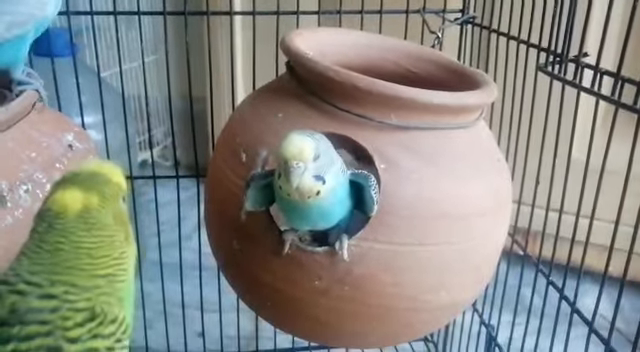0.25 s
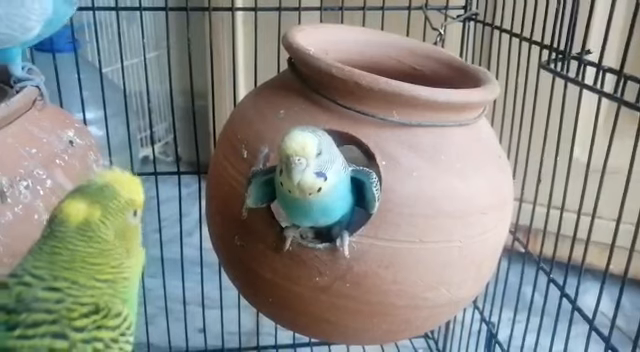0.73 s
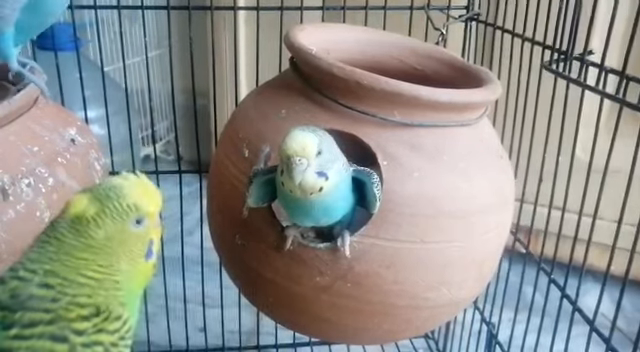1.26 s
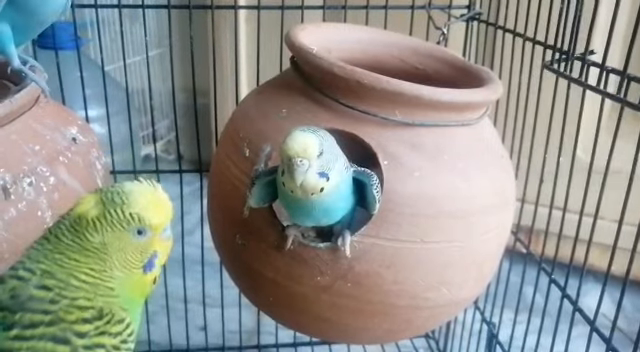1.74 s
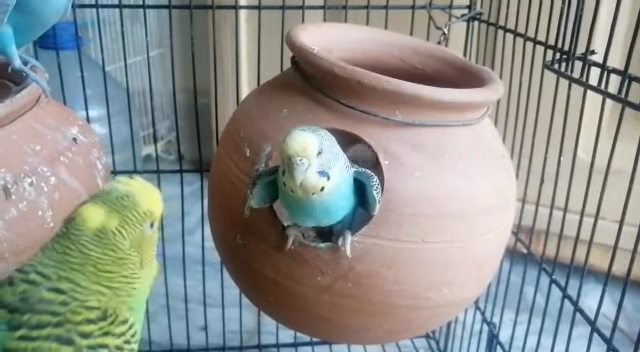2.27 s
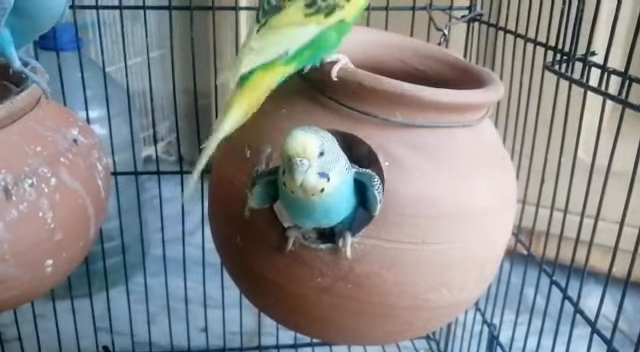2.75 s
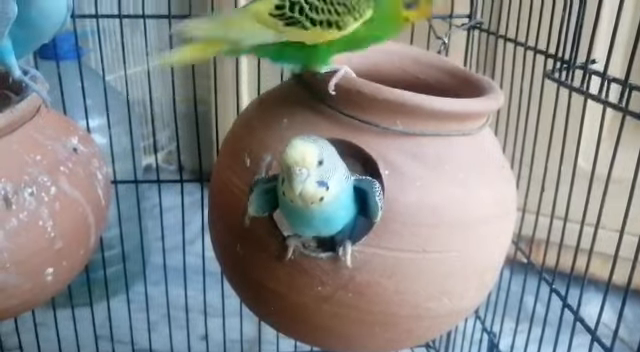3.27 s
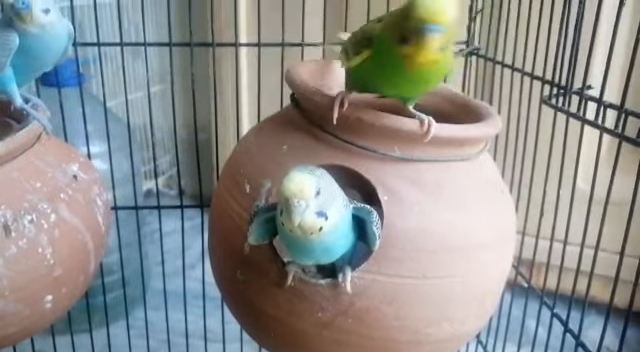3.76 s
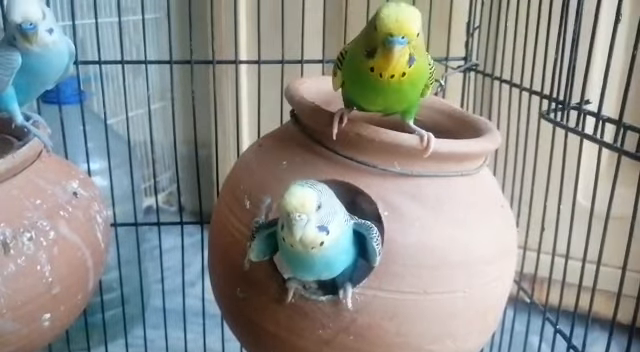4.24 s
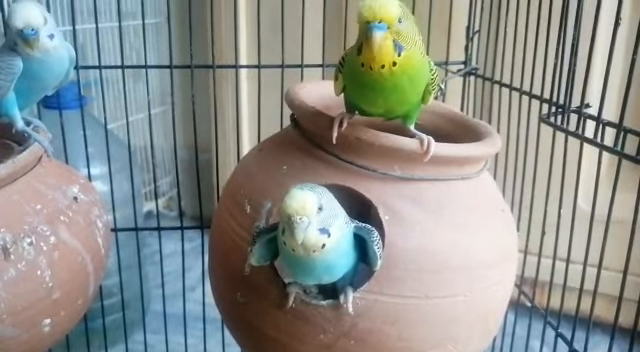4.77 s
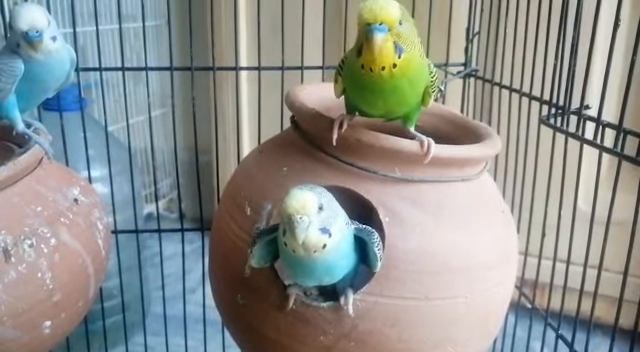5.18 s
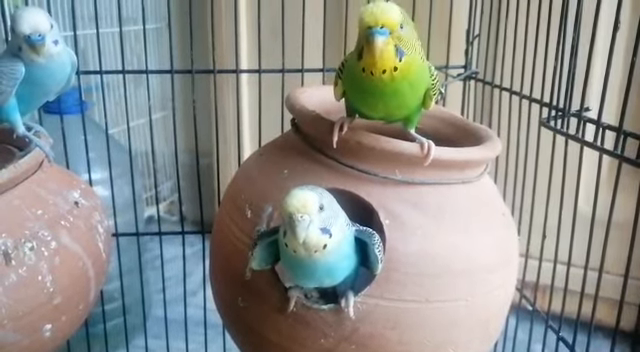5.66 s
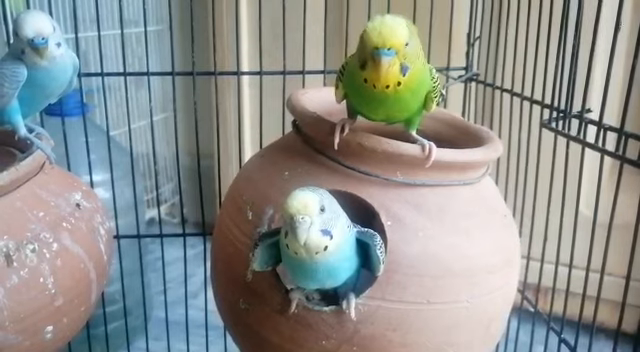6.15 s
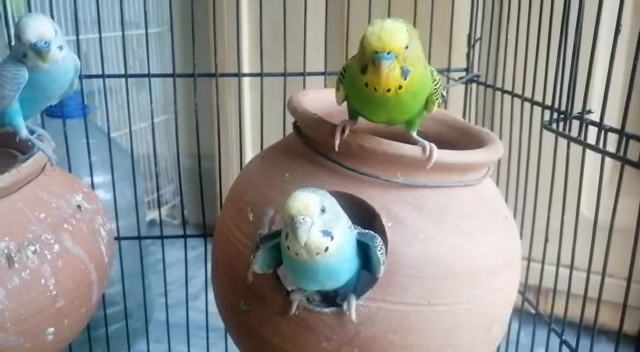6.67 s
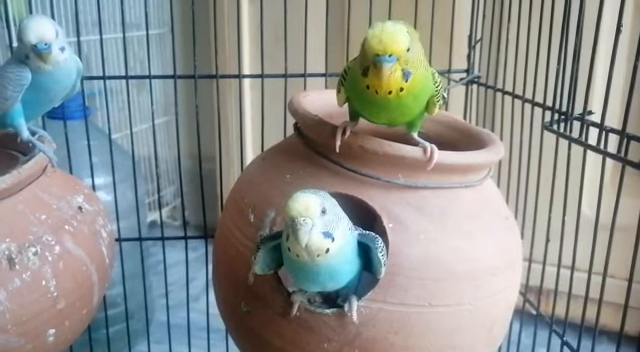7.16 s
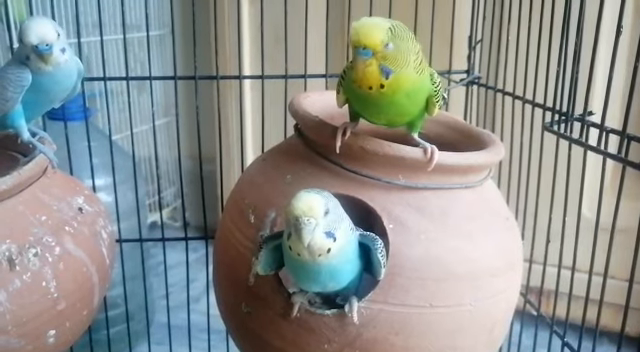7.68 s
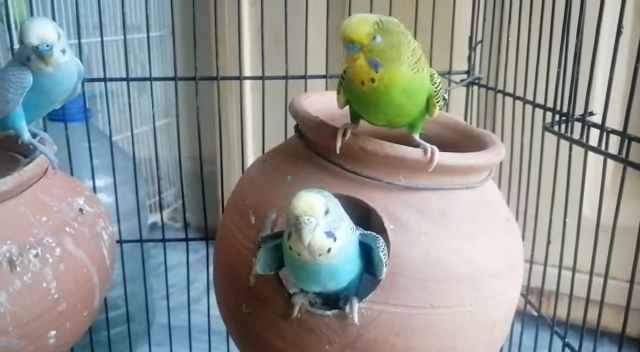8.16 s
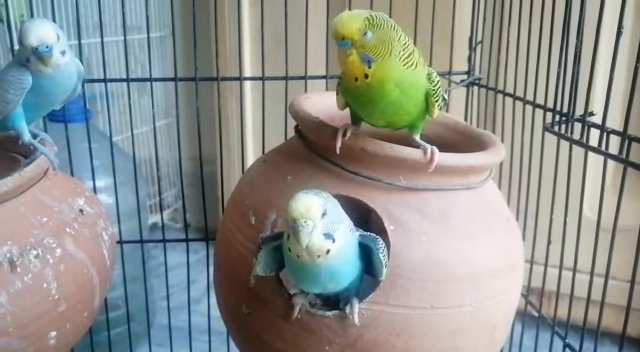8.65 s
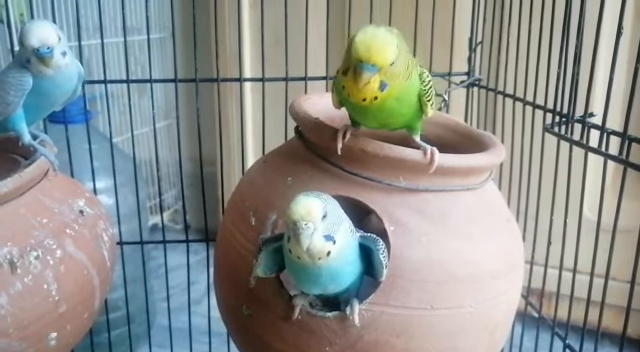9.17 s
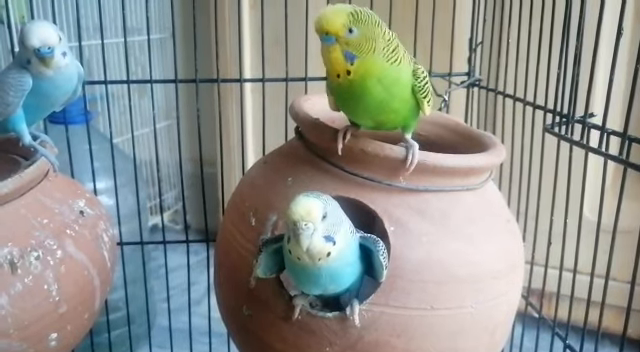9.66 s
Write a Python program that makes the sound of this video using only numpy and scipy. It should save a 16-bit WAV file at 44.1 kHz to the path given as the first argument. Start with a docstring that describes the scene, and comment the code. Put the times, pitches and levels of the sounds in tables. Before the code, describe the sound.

In a slightly echoing room, a nearby caged budgerigar warbles in short glides, croaks and clucks as more distant birds peep and squawk. A quick, soft thumping of wings reaches the microphone, then the chirping resumes, mixed with lower falling calls and a few small hard ticks. The chatter thins briefly and then builds to its liveliest at the end. Faint room air and a low hum lie underneath.

```python
"""A squawk and a faint babble come first: budgerigars chattering in a wire cage in a hard-walled room.
A bird close by warbles in quick whistled glides, buzzes and clucks; others further off answer with
falling calls. Each voice is a source and a filter: the syrinx vibrates, throat and beak resonate.
One bird flies up to a clay pot and its wings puff air at the microphone; claw or beak ticks on
something hard. The walls reflect the chatter, faint high hisses pass, and a low hum lies under it all."""
import sys
import numpy as np
from scipy import signal
from scipy.fft import rfft, irfft, next_fast_len
from scipy.io import wavfile

SR = 44100
rng = np.random.default_rng(int(sys.argv[2]) if len(sys.argv) > 2 else 0)


def dump_mix(stems):
    """Bounce the given channels to the path in sys.argv[1] as a 16-bit WAV at rate SR."""
    frames = np.atleast_2d(stems).T  # one column per channel
    limited = np.clip(frames, -1, 1)  # hard clip at full scale
    pcm = np.round(limited * 32767).astype(np.int16)
    wavfile.write(sys.argv[1], SR, pcm)


N = 437472
TIME = np.arange(N) / SR
CUTOFF_HZ = 15700

# Event levels are relative, ahead of later gains and filters. Balance is left minus right.
# Spectrum of the steady room air: (frequency [Hz], relative level [dB])
AIR_SPECTRUM = [(15, -31), (25, -4.5), (64, -0.5), (567, -16.5), (1490, -11), (2300, -17), (3260, -12),
                (4260, -17.5), (5280, -19), (6550, -7.5), (9050, -25.5), (14300, -30.5), (15500, -44)]
# Spectrum of the low shuffling: (frequency [Hz], relative level [dB])
SHUFFLE_SPECTRUM = [(90, -9), (160, .5), (260, -6), (520, -7), (900, -20), (3000, -49)]
# Faint background swells: (centre [s], half-width [s], rumble level [dB], shuffle level [dB])
LOW_SWELLS = [(0, 0.19, -75, -57.5), (1, 0.32, -61, -72), (2.95, 0.6, -66, -60), (4.449, 0.15, -59, -59),
              (5.3, 0.47, -55.5, -70), (6.05, 0.91, -65.5, -59), (8.7, 0.33, -51.5, -66.5)]
# Reverberation time of the room: (frequency [Hz], time to fall 60 dB [s])
ROOM_DECAY = [(300, 0.69), (800, 0.63), (1500, 0.7), (3000, 0.66), (6000, 0.7), (10000, 0.39),
              (16000, 0.67)]
# Balance of the two microphone ports: (frequency [Hz], balance [dB])
PORT_BALANCE = [(100, -2.5), (600, 0), (1400, -1), (2800, -9), (4500, -6.5), (6500, -5.5), (9000, 8.5),
                (13000, -4)]
# Bouts of flock babble: (start [s], end [s], level [dB])
BABBLE_BOUTS = [(0, 1.483, -39), (1.425, 2.54, -47), (3.15, 3.35, -45.5), (4.207, 4.5, -44),
                (5.886, 6.7, -57.5), (9.134, 9.637, -38)]
# Timbre of the babble: (frequency [Hz], gain [dB])
BABBLE_RESPONSE = [(800, -24), (1500, -12.5), (2300, 5), (3300, 12.5), (4200, -3.5), (5400, 3), (6800, -13),
                   (9000, -16), (15000, -60.5)]
# Faint, uneven puffs of very high hiss: (time [s], length [s], level [dB])
HIGH_HISSES = [(2.534, 0.33, -69), (3.274, 0.089, -58), (4.918, 0.19, -63.5), (7.535, 0.35, -59),
               (8.406, 0.12, -55)]
# Claw or beak on something hard: (time [s], level [dB], ring frequency [Hz])
HARD_TICKS = [(5.564, -8.5, 9700), (5.573, -34, 11000), (4.311, -19, 13400), (4.332, -24, 13500),
              (6.617, -31, 6500), (6.649, -46, 6000)]
# Wing beats that reach the microphone: (time [s], level [dB], frequency [Hz], time to fall 60 dB [s])
WING_BEATS = [(2.57, -27.5, 59, 0.084), (2.626, -29.5, 51.7, 0.084), (2.671, -43, 60.6, .1)]
# Resonances of throat and beak: (frequency [Hz], gain [dB])
VOCAL_TRACT = [(300, -22.5), (700, -10), (1500, -13.5), (2200, 0), (3100, 2.5), (4200, -8.5), (5400, -4),
               (7000, -7.5), (9000, -26), (11500, -42), (16000, -44)]
# Rasp lies high, leaving the lowest harmonics clear: (frequency [Hz], gain [dB])
RASP_TILT = [(1300, -5), (2100, 0)]
# Distant voices lose their top on the way: (frequency [Hz], gain [dB])
FAR_RESPONSE = [(420, 6.5), (950, 4.5), (1450, 8), (1800, -1), (2500, -1), (3300, -5), (4200, -1.5),
                (5500, -2.5), (7200, -7.5), (8400, -8.5), (11500, -2.5)]
# Distant calls and squawks:
# (time [s], length [s], pitch [Hz], glide [octaves], rasp [0-1], level [dB], treble [dB], balance [dB])
DISTANT_CALLS = [(0.018, 0.062, 1700, 0.041, 0.81, -38.5, 13.5, 0.5),
                 (0.46, 0.098, 1380, -0.49, 0.1, -54, -12, 9), (0.617, .085, 1630, -0.084, 0.3, -45, 12, 0),
                 (0.888, 0.062, 1395, 0.033, 0.42, -35, 3, -0.5),
                 (1.101, 0.037, 2244, 0.33, 0, -37, -12, 2),
                 (1.422, 0.11, 1434, -0.35, 0.42, -49, 18.5, -2),
                 (1.568, 0.045, 2133, 0.75, 0.34, -41, -19, -2),
                 (1.632, 0.0397, 1635, 0.29, .5, -52, -31, 4),
                 (1.699, 0.037, 2390, -0.47, .2, -36.5, -7, -1),
                 (2.046, 0.086, 2266, -.07, 0, -45.5, 8, -3),
                 (3.605, 0.028, 2195, -0.75, 0.38, -35.5, -16, 9.5),
                 (3.636, 0.054, 786, -.8, 0.43, -38, -26, -3.5),
                 (3.662, .12, 495, -.49, 0.56, -39.5, -2, -0.5),
                 (3.925, 0.037, 2773, -0.28, 0.1, -19.5, -1, -2),
                 (4.135, .125, 860, -.55, 0.23, -36, -53, 3.5),
                 (4.437, 0.14, 708, -.42, 0.19, -35.5, 2, 0.5), (4.73, .12, 681, -0.2, 0.11, -42.5, -2, -6),
                 (5.006, 0.13, 733, -0.29, 0.15, -43, -3, 10),
                 (6.63, .091, 1630, -0.065, 0.07, -53, 10, -5),
                 (7.101, 0.047, 792, -.74, 0.16, -39, -10, 3),
                 (7.125, 0.079, 494.6, -0.67, 0.68, -30.5, 2.5, -0.5),
                 (7.378, 0.12, 1086, -0.34, 0.21, -30, -2.5, 0.5),
                 (7.696, 0.15, 1218, -0.54, 0.1, -26.5, -14, -1.5),
                 (8.053, 0.084, 1355, 0.24, 0.23, -28.5, -9.5, 5.5),
                 (8.125, 0.096, 1541, 0.16, 0.06, -22.5, -12, -1.5)]
# Thin distant peeps, all near one pitch: (time [s], pitch [Hz], glide [octaves], level [dB])
DISTANT_PEEPS = [(.067, 3440, 0.0093, -37), (.643, 3370, 0, -44), (1.117, 3364, -0.082, -33),
                 (1.422, 3510, -.06, -37), (1.715, 3413, 0.0019, -41), (2.041, 3386, 0.14, -43),
                 (2.294, 3462, -.04, -44.5)]
# Hollow chest note of a bird heard from close by: (frequency [Hz], gain [dB])
CHEST_RESPONSE = [(400, -21), (780, 9.5), (1150, 5.5), (2000, 0)]
# Close notes that hold their pitch, then slide:
# (time [s], length [s], pitch [Hz], glide [octaves], rasp [0-1], level [dB], treble [dB], balance [dB])
SLURRED_NOTES = [(0.997, 0.038, 2300, -0.2, 0.35, -29.5, -8, -0.5),
                 (1.38, 0.016, 4960, -0.42, 0.1, -35.5, -27, 0),
                 (3.44, 0.032, 3000, -0.25, 0.14, -27, -11.5, -1.5),
                 (3.492, 0.037, 2705, -0.88, 0.1, -31.5, -45, 0.5),
                 (3.65, 0.038, 3183, 0.12, 0.2, -30, -2.5, -6),
                 (3.708, 0.0078, 3640, -.4, 0.5, -38, -17, 10),
                 (3.74, 0.0117, 2694, 0.47, 0.16, -24.5, -22, 3),
                 (3.78, 0.021, 3204, -0.654, .5, -34.5, -2.5, -6),
                 (4.368, 0.013, 1535, 0.22, 0.32, -33, -14.5, 25.5),
                 (4.398, 0.028, 2807, -.5, 0.81, -45, -32, -18),
                 (4.62, 0.034, 3194, -0.12, 0.63, -23, 4, -2),
                 (5.063, 0.037, 3450, -0.65, 0.2, -28.5, -12, 4),
                 (5.542, .009, 1440, -0.091, .3, -32.5, -16, -2.5),
                 (5.645, 0.027, 881, -0.33, 0.73, -26.5, -1.5, 15),
                 (5.895, 0.031, 2460, -0.62, 0.04, -33, 2, 3),
                 (6.161, 0.039, 3180, -0.115, 0.05, -35.5, -7.5, 3),
                 (6.35, 0.021, 2306, -0.174, 1, -36, -8, 2),
                 (6.368, 0.0066, 2134, -0.44, 0.4, -35.5, -28, 5),
                 (6.596, 0.0064, 2230, 0.23, 0, -40, -7, 2),
                 (6.623, 0.0099, 1773, 0.38, 0.3, -32.5, -13.5, 6.5),
                 (7.053, 0.018, 1880, -0.15, 0.27, -40.5, -25, 0),
                 (7.903, 0.049, 3095, -0.21, 0.15, -26.5, -8.5, 2),
                 (7.978, 0.044, 2390, -0.1, 0.24, -29, -3.5, -0.5),
                 (8.017, 0.0119, 3700, -.5, 0.9, -28, 2, -1),
                 (8.334, 0.0056, 3760, 0.55, 0.1, -28.5, -9, -2),
                 (8.345, 0.036, 3440, -0.39, 0.31, -26.5, -3, 3),
                 (8.89, 0.021, 2607, -0.042, 0.55, -31.5, -4, 1),
                 (9.066, 0.033, 2424, 0.74, 0.83, -23.5, 8, 1),
                 (9.096, 0.051, 2234, -.75, 0.12, -28, -0.5, -2.5),
                 (9.142, .024, 3660, -0.3, 0.26, -23, -3.5, 1), (9.159, 0.049, 2957, .03, 0, -16, -17, 11),
                 (9.211, 0.013, 2970, -0.4, 0.48, -21, -14, -6),
                 (9.239, 0.023, 3260, -0.071, 0.59, -30.5, 4, -3.5)]
# Close chirps that rise and fall back: (time [s], length [s], middle pitch [Hz], level [dB], treble [dB])
ARCHED_CHIRPS = [(.316, 0.0178, 2600, -28, 9.5), (5.845, 0.0192, 2656, -29.5, -3),
                 (8.41, .061, 3182, -27, -9), (8.99, 0.0196, 2500, -25, -5), (9.34, .026, 2890, -30, 2),
                 (9.439, 0.032, 2796, -30, 18), (9.524, 0.028, 3103, -23.5, 5.5),
                 (9.607, 0.0248, 3075, -23, 3.5), (9.692, 0.022, 3103, -20.5, 2)]
# Ends of an arched chirp against its middle: (start [octaves], end [octaves])
ARCH_ENDS = (-.6, -0.294)
# Close chirps that swoop down and hook up:
# (time [s], length [s], middle pitch [Hz], swoop [octaves], level [dB], treble [dB], balance [dB])
DIPPED_CHIRPS = [(1.382, 0.035, 2730, .6, -24.5, -17, -1), (5.718, 0.028, 2133, 0.27, -32.5, 3.5, -1),
                 (5.752, 0.029, 1702, 0.238, -35, 2.5, -1), (5.865, 0.037, 1500, 0.35, -35, -0.5, 5),
                 (5.922, 0.025, 1653, 0.36, -34.5, 1, -2), (6.143, 0.01, 2286, .28, -28, -15, 2.5),
                 (6.204, 0.013, 2296, 0.276, -33.5, -28, 1), (8.316, 0.013, 2560, 0.17, -23, -13, 2.5),
                 (8.457, 0.022, 1567, 0.493, -33.5, -28, -2.5), (8.654, 0.028, 1728, 0.12, -43.5, -8, 1),
                 (8.682, 0.023, 2486, 0.206, -25, -29, 0.5), (8.709, 0.02, 2406, 0.21, -24.5, -9, 4)]
# Low, hoarse croaks: (time [s], length [s], nominal pitch [Hz], level [dB], treble [dB], balance [dB])
CLOSE_CROAKS = [(0.378, 0.0086, 1742, -27.5, 2.5, 5), (0.602, 0.026, 1618, -30.5, 1, 7),
                (0.732, 0.02, 1284, -38, -3, -3), (0.862, 0.02, 1656, -31, -1, -2.5),
                (2.931, 0.026, 611, -42.5, -2.5, -0.5), (3.073, 0.016, 890, -31.5, 1, 4),
                (3.234, 0.021, 844, -32.5, 0, 3.5), (3.334, 0.0267, 881.4, -28, 0.5, 0.5),
                (3.811, 0.034, 503, -39, -21, -1), (5.597, 0.0105, 1756, -27.5, -0.5, 6),
                (6.321, 0.0305, 1095, -41, 1.5, 1), (6.773, 0.0067, 1100, -35.5, -21, 4),
                (6.807, 0.0095, 1104, -30, -36, 4.5), (6.93, .011, 1058, -40, -30, 5),
                (6.962, 0.0287, 1069, -32, -18, 0), (7.32, 0.011, 857, -27.5, -5, 3.5),
                (7.349, 0.018, 837, -42, 7, -3), (8.6, 0.0054, 1367, -32.5, -8, 1),
                (8.816, 0.013, 853, -26.5, -3, 4), (8.851, 0.0068, 847, -41, 6, -10),
                (9.37, 0.0088, 860, -40, 19.5, -16), (9.706, 0.081, 650.6, -31.5, -2.5, 4.5)]
# Buzzes of slow pulses: (time [s], length [s], nominal pulse rate [Hz], level [dB], treble [dB])
CLOSE_BUZZES = [(0.205, 0.035, 163, -27.5, 4), (0.442, 0.023, 198, -30, 3.5),
                (1.251, 0.0168, 182.8, -24, -2), (9.395, .034, 222.4, -23, 14.5)]
# Very short clucks: (time [s], level [dB], treble [dB])
CLOSE_CLUCKS = [(.392, -43, 12), (1.809, -28.5, 5), (1.989, -31, 4.5), (2.1698, -27.5, 13.5),
                (2.349, -27, 13.5), (2.524, -32.5, 5.5), (5.154, -31.5, -2), (6.045, -39, -4),
                (6.485, -50, -9), (6.518, -52, -35), (7.57, -36, 3.5), (7.74, -30, 14), (9.847, -31, 4)]


def from_db(db):
    """Amplitude grows tenfold for every 20 dB."""
    return 10 ** (np.asarray(db) / 20)


def unit_rms(x):
    """Normalise to a mean power of one."""
    return x / np.sqrt(np.mean(x ** 2) + 1e-20)


def at_hz(points, hz):
    """Interpolate a table on a log-frequency axis."""
    f, value = np.transpose(points)
    return np.interp(np.log(np.maximum(hz, 1)), np.log(f), value)


def colour(x, db_at):
    """Zero-phase filtering: multiply the spectrum by a response in dB, a function of Hz."""
    size = next_fast_len(x.shape[-1] + 256)
    gain = from_db(db_at(np.fft.rfftfreq(size, 1 / SR)))
    return irfft(rfft(x, size) * gain, size)[..., :x.shape[-1]]


def band(x, low_hz, high_hz):
    """Band-pass filtering attenuates what lies outside two edges."""
    sections = signal.butter(2, [low_hz, min(high_hz, .48 * SR)], "band", fs=SR, output="sos")
    return signal.sosfilt(sections, x)


def wander(size, rate):
    """Random modulation: a curve that takes a new value `rate` times a second."""
    return np.interp(np.arange(size) * rate / SR, np.arange(1024), rng.standard_normal(1024))


def add(out, s, sound):
    """Superposition: mix a sound into out from time s on."""
    at = int(np.clip(round(s * SR), 0, N))
    out[..., at:at + sound.shape[-1]] += sound[..., :N - at]


def panned(sound, left_db):
    """A level difference between the channels places a sound to one side."""
    return sound * from_db([[left_db / 2], [-left_db / 2]])


def from_left(x, lag_ms):
    """Path difference: sound from the left reaches the right port later."""
    return np.array([x[0], np.pad(x[1], (int(lag_ms * SR / 1000), 0))[:N]])


def stereo_noise(width=.48):
    """Partial coherence: the channels share one noise and take a second with opposite signs."""
    mid, side = rng.standard_normal((2, N))
    return mid + width * side * np.array([[1], [-1]])


def background(hum_hz=49.5, hum_db=-66, air_db=-59):
    """Steady room air and a pure hum, superposed on rumble and shuffling that swell together."""
    rumble_gain, shuffle_gain = from_db(-70.5), from_db(-65.5)   # between the swells
    for s, half_width, rumble_db, shuffle_db in LOW_SWELLS:
        hump = np.exp(-((TIME - s) / half_width) ** 2)
        rumble_gain = rumble_gain + from_db(rumble_db) * hump
        shuffle_gain = shuffle_gain + from_db(shuffle_db) * hump
    air = from_db(air_db) * unit_rms(colour(stereo_noise(), lambda f: at_hz(AIR_SPECTRUM, f)))
    rumble = rumble_gain * unit_rms(band(stereo_noise(), 40, 113))
    shuffle = shuffle_gain * unit_rms(colour(stereo_noise(), lambda f: at_hz(SHUFFLE_SPECTRUM, f)))
    hum = from_db(hum_db) * np.sin(2 * np.pi * hum_hz * TIME)
    return air + from_db(-3) * rumble + from_db(-2) * shuffle + hum


def room(x, early_db=.5, build_s=.015, reflections=10):
    """Reverberation: sharp reflections from nearby walls and a diffuse tail that decays band by band."""
    t = TIME[:SR]
    edges = np.geomspace(250, 16000, 9)
    tail = 0
    for low, high in zip(edges, edges[1:]):
        t60 = at_hz(ROOM_DECAY, np.sqrt(low * high))
        tail = tail + band(rng.standard_normal((2, SR)), low, high) * from_db(-60 * t / t60)
    build_up = 1 - np.exp(-(t / build_s) ** 2)
    response = unit_rms(tail * build_up) / np.sqrt(SR)
    for side in response:
        lags = (rng.uniform(.002, .03, reflections) * SR).astype(int)
        side[lags] += from_db(early_db) / np.sqrt(reflections) * rng.choice([-1, 1], reflections)
    return signal.fftconvolve(x, response, axes=-1)[:, :N]


def flock_babble(count=380, spread_db=4, lull_db=-77.5, fade_s=.43):
    """Incoherent summation: many scratchy random glides merge into a babble that comes in bouts."""
    chirps = np.zeros(N)
    for i, (when, span, pitch, bend, slope, loud) in enumerate(rng.random((count, 6))):
        u = np.linspace(-1, 1, int((.02 + .04 * span) * SR))
        octaves = .5 * (slope - .6) * u + .5 * (bend - .5) * u ** 2 + .07 * wander(len(u), 1200)
        hz = (1300 + 1900 * pitch) * 2 ** octaves
        phase = 2 * np.pi * np.cumsum(hz) / SR
        tone = sum(np.sin(k * phase) for k in range(1, 5))
        add(chirps, (i + when) / count * N / SR, from_db(spread_db * loud) * (1 - u ** 2) * tone)
    gain = from_db(lull_db)
    for start, end, db in BABBLE_BOUTS:
        inside_s = np.minimum(TIME - start, end - TIME)
        gain = gain + from_db(db) * np.clip(.5 + inside_s / fade_s, 0, 1)
    return gain * unit_rms(colour(chirps, lambda f: at_hz(BABBLE_RESPONSE, f)))


def high_hiss(uneven_db=4):
    """Amplitude-modulated noise: faint, uneven puffs of very high hiss."""
    out = np.zeros(N)
    for s, length, db in HIGH_HISSES:
        size = int(length * SR)
        hiss = band(rng.standard_normal(SR)[:size], 7000, 24000)
        uneven = hiss * from_db(uneven_db * wander(size, 50))
        add(out, s, from_db(db) * unit_rms(uneven * np.hanning(size)))
    return out


def damped(hz, t60):
    """A damped oscillator: a sine that falls 60 dB in t60 seconds."""
    t = TIME[:SR // 4]
    return np.sin(2 * np.pi * hz * t) * from_db(-60 * t / t60)


def ticks():
    """Impact excitation: claw or beak sets something hard ringing very briefly."""
    out = np.zeros(N)
    for s, db, hz in HARD_TICKS:
        add(out, s, from_db(db) * damped(hz, t60=.00062))
    return band(out, 6800, 14000)


def wing_puffs():
    """Air displacement: a wing beat reaches the microphone as a slow, damped pressure pulse."""
    out = np.zeros(N)
    for s, db, hz, t60 in WING_BEATS:
        add(out, s, from_db(db) * damped(hz, t60))
    return panned(out, left_db=14)


def glide(hz, octaves, early):
    """Start, middle and end pitch of a frequency sweep; `early` is the share done by the middle."""
    return hz * 2 ** (octaves * np.array([-early, 0, 1 - early]))


def turn(hz, start_octaves, end_octaves):
    """Start, middle and end pitch of a sweep that reverses near hz."""
    return hz * 2 ** np.array([start_octaves, 0, end_octaves])


def syllable(length, pitches, rasp, treble_db, bass_db, attack, release, jitter, flutter_db,
             quiver=.0067):
    """Source and filter: the syrinx gives harmonics and pulsed noise, and the throat shapes both."""
    def throat(f):
        tilt_db = at_hz([(1500, bass_db), (2100, 0), (3700, 0), (5000, treble_db)], f)
        return at_hz(VOCAL_TRACT, f) + tilt_db

    size = int(length * SR)
    u = np.linspace(0, 1, size)   # attack and release are shares of this span
    contour = np.polyval(np.polyfit([0, .5, 1], pitches, 2), u)
    shake = 1 + jitter * rasp * wander(size, 900) + quiver * wander(size, 200)
    hz = np.maximum(contour * shake, 100)
    phase = 2 * np.pi * np.cumsum(hz) / SR
    k = np.arange(1, min(int(CUTOFF_HZ / hz.min()), 48) + 1)[:, None]   # harmonic numbers
    strength = from_db(throat(k * hz)) * (k * hz < SR / 2)
    tone = np.sum(strength * np.sin(k * phase), 0) / np.sqrt(np.sum(strength ** 2, 0) / 2 + 1e-20)
    puffs = rng.standard_normal(SR // 3)[:size] * (.15 + np.cos(phase / 2) ** 6)   # one each cycle
    hiss = unit_rms(colour(puffs, lambda f: throat(f) + at_hz(RASP_TILT, f)))
    hiss_gain = .92 * rasp
    voice = np.sqrt(1 - hiss_gain ** 2) * tone + hiss_gain * hiss
    envelope = np.sin(np.pi / 2 * np.clip(np.minimum(u / attack, (1 - u) / release), 0, 1))
    flutter = from_db(flutter_db * wander(size, 146.8))
    return unit_rms(voice * envelope * flutter)


def far_note(length, pitches, rasp, db, treble_db, easy_db=-34.5):
    """Vocal effort: the louder a trembling call, the less bass it has and the more abruptly it starts."""
    effort_db = db - easy_db
    attack_s = .017 * from_db(-.5 * effort_db)
    call = syllable(length, pitches, rasp, treble_db, bass_db=-.71 * effort_db,
                    attack=min(attack_s / length, .3), release=.18,
                    jitter=.1013, flutter_db=3.5, quiver=.0087)
    return from_db(db) * call


def far_birds(early=.66, peep_s=.0726):
    """High-frequency loss with distance dulls calls that slide and settle, and nearly level peeps."""
    out = np.zeros((2, N))
    for s, length, hz, octaves, rasp, db, treble_db, left_db in DISTANT_CALLS:
        call = far_note(length, glide(hz, octaves, early), rasp, db, treble_db)
        add(out, s, panned(call, left_db))
    for s, hz, octaves, db in DISTANT_PEEPS:
        peep = far_note(peep_s, glide(hz, octaves, early), rasp=.36, db=db, treble_db=-10)
        add(out, s, panned(peep, left_db=-2.5))
    return colour(out, lambda f: at_hz(FAR_RESPONSE, f))


def close_note(length, pitches, db, treble_db, rasp, easy_db=-33.5):
    """Vocal effort: a pressed note loses bass as it gains level; a hoarse one flutters more."""
    note = syllable(length, pitches, rasp, treble_db, bass_db=easy_db - db,
                    attack=.15, release=.22, jitter=.0938, flutter_db=4.5 + rasp)
    return from_db(db) * note


def warble(dip_hook=.51):
    """Frequency modulation of the syrinx draws slurs, arches, dips, and sagging croaks and buzzes."""
    out = np.zeros((2, N))
    for s, length, hz, octaves, rasp, db, treble_db, left_db in SLURRED_NOTES:
        slur = close_note(length, glide(hz, octaves, early=.2966), db, treble_db, rasp)
        add(out, s, panned(slur, left_db))
    for s, length, hz, db, treble_db in ARCHED_CHIRPS:
        arch = close_note(length, turn(hz, *ARCH_ENDS), db, treble_db, rasp=.18)
        add(out, s, panned(arch, left_db=2))
    for s, length, hz, octaves, db, treble_db, left_db in DIPPED_CHIRPS:
        dip = close_note(length, turn(hz, octaves, dip_hook * octaves), db, treble_db, rasp=.2)
        add(out, s, panned(dip, left_db))
    sag = glide(.95, octaves=-.1674, early=.602)   # ratios to the nominal pitch
    for s, length, hz, db, treble_db, left_db in CLOSE_CROAKS:
        croak = close_note(length, hz * sag, db, treble_db, rasp=.9, easy_db=-30)
        add(out, s, panned(croak, left_db))
    for s, length, hz, db, treble_db in CLOSE_BUZZES:
        buzz = close_note(length, hz * sag, db, treble_db, rasp=1, easy_db=-44.5)
        add(out, s, panned(buzz, left_db=3))
    return out


def clucks():
    """Vocal transients: each snaps open and dies within a dozen cycles."""
    out = np.zeros((2, N))
    for s, db, treble_db in CLOSE_CLUCKS:
        cluck = syllable(length=.0062, pitches=(1690, 1800, 1680), rasp=.86, treble_db=treble_db,
                         bass_db=-12, attack=.2, release=.68, jitter=.07, flutter_db=1)
        add(out, s, panned(from_db(db) * cluck, left_db=-2))
    return out


def near_bird(warble_db=-1.7, cluck_db=3):
    """Resonance gives the close bird's low syllables a hollow chest note."""
    voice = from_db(warble_db) * warble() + from_db(cluck_db) * clucks()
    return colour(voice, lambda f: at_hz(CHEST_RESPONSE, f))


def scene():
    """Direct-to-reverberant ratio conveys distance: high for the close bird, lower for the others."""
    near, far = near_bird(), far_birds()
    noises = ticks() + wing_puffs() + high_hiss()
    direct = from_left(near + noises, lag_ms=.545) + from_db(-.5) * from_left(far, lag_ms=.33)
    near_to_room = colour(near, lambda f: at_hz([(3200, -8.5), (5000, -6)], f))
    to_room = near_to_room + from_db(-2) * far + from_db(-5) * flock_babble() + from_db(-20) * noises
    return direct + room(to_room) + background()


def record(dry):
    """Frequency response: each microphone port has its own colour, and a steep low-pass cuts the top."""
    left = colour(dry[0], lambda f: at_hz(PORT_BALANCE, f) / 2)
    right = colour(dry[1], lambda f: -at_hz(PORT_BALANCE, f) / 2)
    low_pass = signal.ellip(10, .1, 90, CUTOFF_HZ, fs=SR, output="sos")
    return signal.sosfilt(low_pass, [left, right])


dry = scene()
out = record(dry)
dump_mix(out)
```